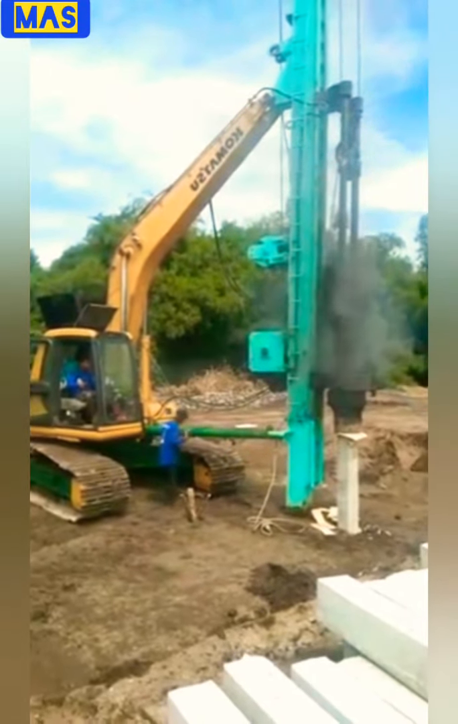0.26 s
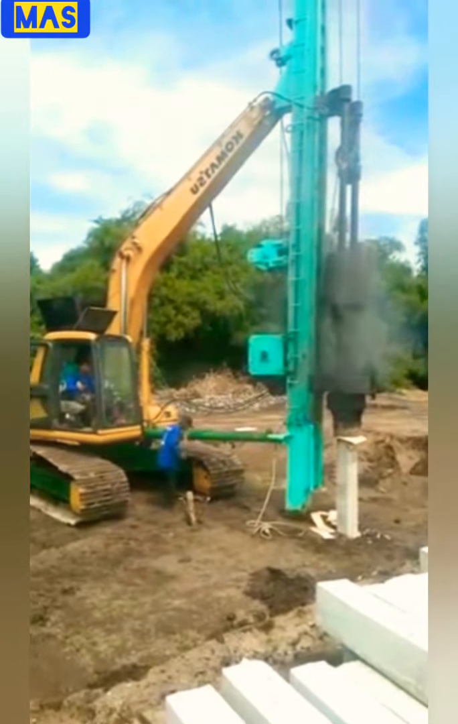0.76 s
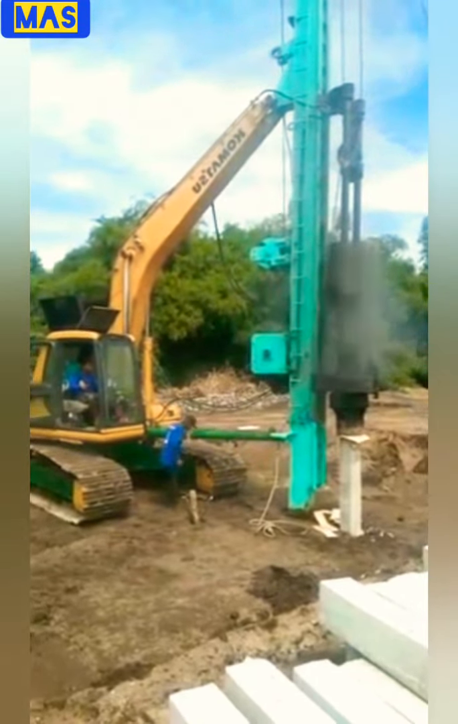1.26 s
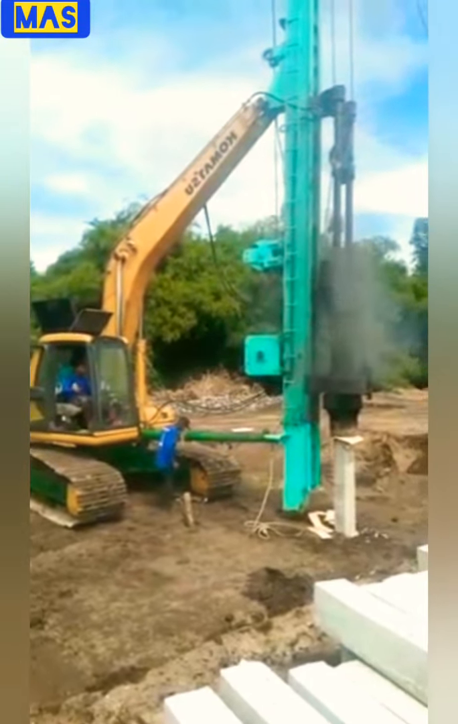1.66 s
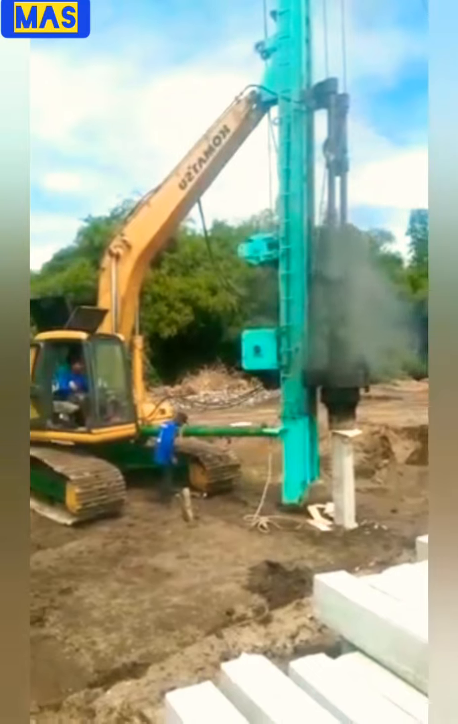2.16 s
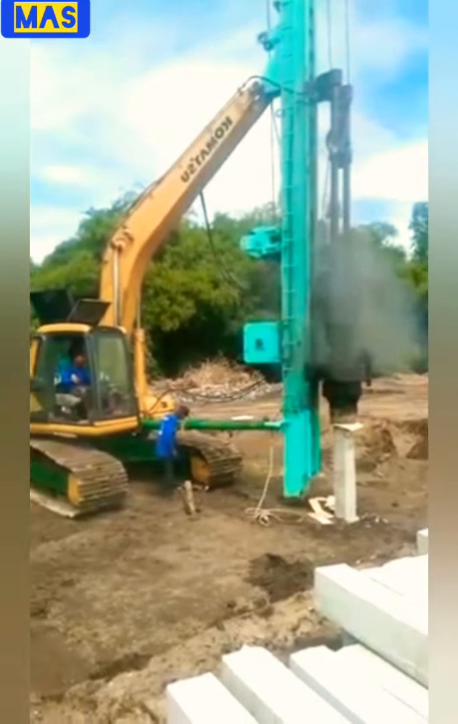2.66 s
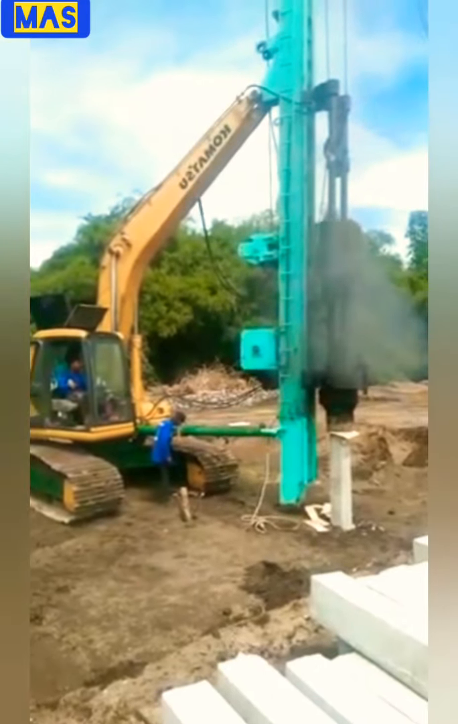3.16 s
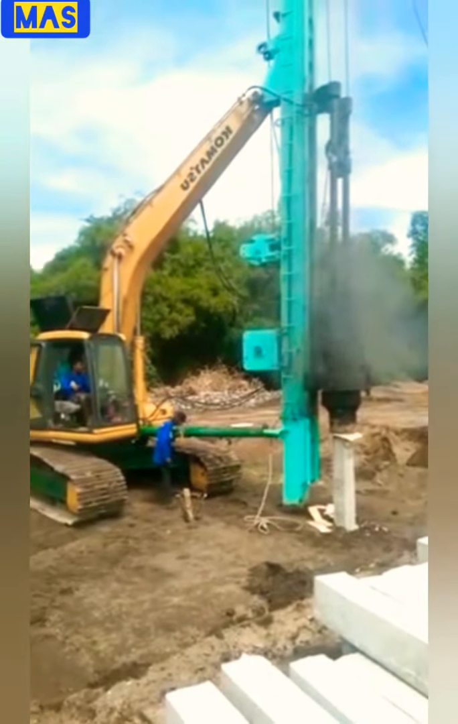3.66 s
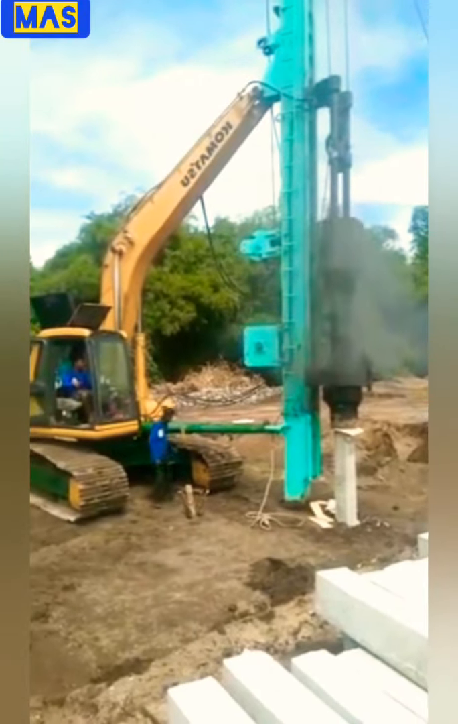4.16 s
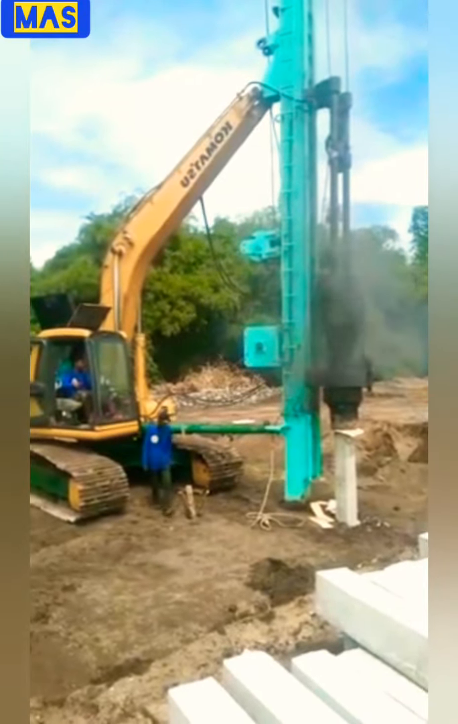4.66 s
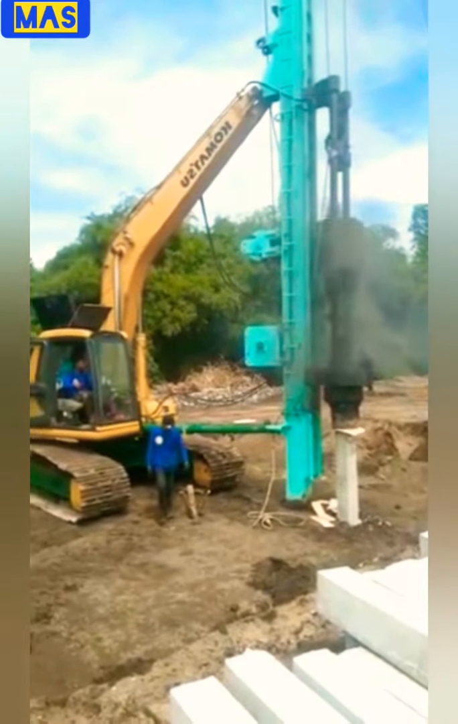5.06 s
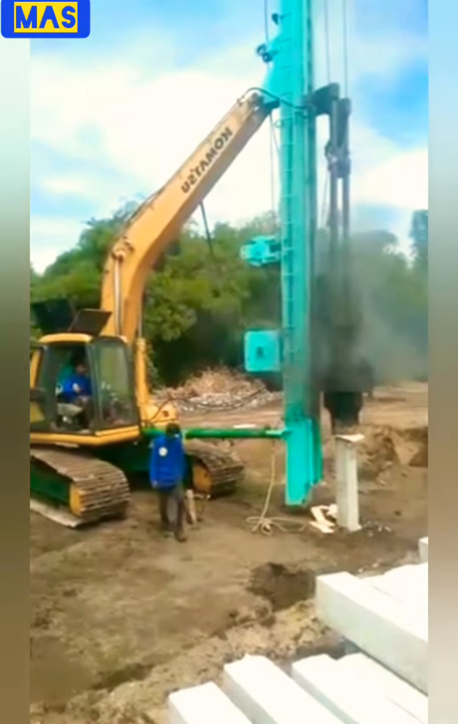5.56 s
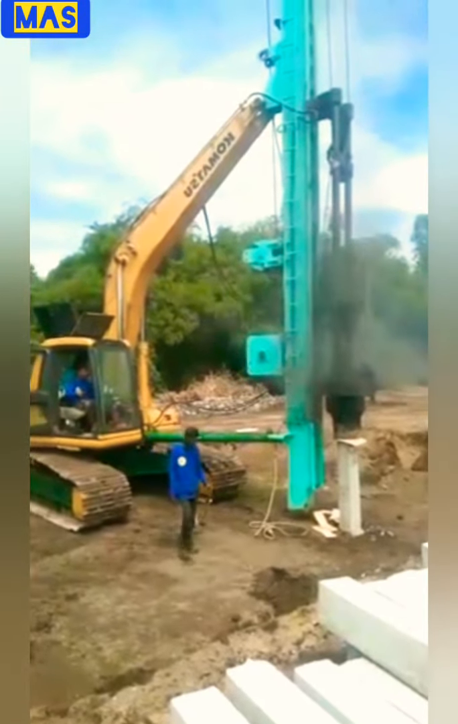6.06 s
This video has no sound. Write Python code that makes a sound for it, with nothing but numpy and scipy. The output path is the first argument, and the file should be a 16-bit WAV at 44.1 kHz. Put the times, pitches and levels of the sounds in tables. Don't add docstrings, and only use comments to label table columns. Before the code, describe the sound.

Seven strong metal strikes repeat evenly over a low, lumpy diesel idle. A dull double knock announces each bright clang; loose steel clatters for a moment until exhaust gas bursts out with a deep pipe-like thump. Air is sucked back with a brief hiss, then faint ticks and soft thuds fill the gap. Outdoors, with short scattered reflections, heard from a distance through a limited phone microphone.

```python
import sys
import numpy as np
from scipy import signal
from scipy.fft import rfft, irfft
from scipy.io import wavfile
from scipy.ndimage import uniform_filter1d, minimum_filter1d

SR = 44100
rng = np.random.default_rng(int(sys.argv[2]) if len(sys.argv) > 2 else 0)


def gain_from_decibels(decibels):
    exponent = np.asarray(decibels, float) / 20
    return 10 ** exponent


def persist_wave(psi):
    counts = np.round(np.clip(psi, -1, 1) * 32767).astype(np.int16)
    wavfile.write(sys.argv[1], SR, np.atleast_2d(counts).T)


N = 277830
AFTER = np.arange(SR // 4) / SR


def noise(count=len(AFTER)):
    return rng.standard_normal(count)


def evened(x):
    return x / np.sqrt(np.mean(x ** 2) + 1e-20)


def add(mix, s, sound):
    part = mix[round(s * SR):][:len(sound)]
    part += sound[:len(part)]


def coloured(x, colour):
    f, db = np.transpose(colour)
    hz = np.fft.rfftfreq(len(x), 1 / SR)
    level_db = np.interp(np.log(hz + 1), np.log(f + 1), db, -90, -90)
    return evened(irfft(rfft(x) * gain_from_decibels(level_db), len(x)))


def resonate(x, hz, width):
    r = np.exp(-np.pi * width / SR)
    return evened(signal.lfilter([1, 0, -1], [1, -2 * r * np.cos(2 * np.pi * hz / SR), r * r], x))


def swell(t, rise, t60):
    return (1 - np.exp(-t / rise)) ** 2 * gain_from_decibels(-60 * t / t60)


def later(t, s, db, rise, t60):
    return gain_from_decibels(db) * swell(np.maximum(t - s, 0), rise, t60)


def wander(count, span):
    return evened(uniform_filter1d(uniform_filter1d(noise(count), int(span)), int(span)))


def rung(knocks, parts, spread_db):
    rings = []
    for hz, width, db in parts:
        hits = knocks * gain_from_decibels(spread_db * wander(len(knocks), 470))
        rings.append(gain_from_decibels(db) * resonate(hits, hz, width))
    return rings


def ring_out(hz, db, t60):
    wavering = gain_from_decibels(db + 3.3 * wander(len(AFTER), 116))
    return wavering * np.sin(2 * np.pi * hz * AFTER) * swell(AFTER, 0.0011, t60)


def pipe(start_hz, end_hz, rise, t60):
    turns = np.cumsum(end_hz + (start_hz - end_hz) * np.exp(-AFTER / .018)) / SR
    return np.sin(2 * np.pi * turns) * swell(AFTER, rise, t60)


# start_s, peak_db, main_ring_hz, top_ring_db (against the main ring)
BLOWS = [
    (0.2003, -6.5, 4070, 0),
    (1.0805, -7.5, 4150, -23),
    (1.9641, -4, 4010, -27),
    (2.857, -9, 4020, -31),
    (3.7512, -4.5, 4030, -6),
    (4.6421, -4.5, 4090, -22),
    (5.545, -6, 4150, -7),
]
# pitch_hz, level_db, t60_s
ANVIL_RINGS = [(1800, -22, .04), (2390, -10, .085), (2650, -20, .1), (4560, -11, .05), (4800, -15, .045),
               (5200, -14, .03), (5900, -16, .035), (6600, -14, .03), (7400, -20, .045)]
# pitch_hz, density_db (per Hz)
CRACK_COLOUR = [(300, -26), (900, -19.5), (1500, -10.5), (2400, -2), (3300, -22.5), (4300, -3), (6000, -12),
                (8200, -7), (8800, -24.5), (14500, -26.5), (16000, -30)]


def blow(peak_db, hz, top_db):
    contact = np.exp(-(AFTER / .0098) ** 3) + .07 * np.exp(-AFTER / .008)
    onset = (1 - np.exp(-AFTER / .0011)) ** 2
    turns = np.cumsum(hz * (1 + .25 * np.exp(-AFTER / .0016))) / SR
    main = np.sin(2 * np.pi * turns) + gain_from_decibels(top_db) * np.sin(2 * np.pi * 8060 * AFTER)
    main = main * (1 - np.exp(-AFTER / 0.0016)) ** 2
    rings = np.zeros(len(AFTER))
    for f, db, t60 in ANVIL_RINGS:
        rings += gain_from_decibels(db - 60 * AFTER / t60) * np.sin(2 * np.pi * (f * AFTER + rng.random()))
    crack = gain_from_decibels(-60 * AFTER / 0.07) * coloured(noise(), CRACK_COLOUR)
    return gain_from_decibels(peak_db + 7.5) * ((main + crack) * contact + rings) * onset


# start_s, jet_db
BARKS = [
    (0.35, 3.5),
    (1.221, 5),
    (2.105, 5.5),
    (3.001, 5.5),
    (3.898, -6),
    (4.782, 7.5),
    (5.691, -14.5),
]
# pitch_hz, density_db (per Hz)
JET_COLOUR = [(150, -58), (250, -5.5), (845, -21), (1330, -18.5), (1880, -18), (2280, -9), (2620, -19.5),
              (3280, -21), (4260, -12), (6140, -13.5), (7570, -4.5), (8550, -22.5), (16000, -40.5)]


def bark(mix, s, jet_db):
    jet = coloured(noise(), JET_COLOUR)
    puff = np.exp(-((AFTER - .019) / .0062) ** 4)
    leak = gain_from_decibels(-5.5 - 0.86 * jet_db) * swell(AFTER, 0.0048, 0.12)
    add(mix, s - .01, gain_from_decibels(jet_db - 6) * jet * (puff + leak))
    add(mix, s, gain_from_decibels(jet_db - 19.0) * pipe(162, 160, 0.00035, 0.079))


# start_s, level_db
BOOMS = [
    (0.363, -2.5),
    (1.2322, -3.5),
    (2.112, -3),
    (3.0152, -3.5),
    (3.906, -4.5),
    (4.7958, -2),
    (5.694, -3.5),
]


def boom(db):
    slow = gain_from_decibels(-17.5) * pipe(121.5, 140.4, .02, 0.27)
    return gain_from_decibels(db + 4) * (pipe(103.5, 135.6, 0.0023, 0.12) + slow)


# start_s, clatter_db, mast_db, rise_s, clatter_t60_s
REBOUNDS = [
    (0.238, -6, -11, 0.001, 0.22),
    (1.107, -5, -10.5, 0.0011, 0.21),
    (1.992, -6, -10.5, 0.0017, 0.22),
    (2.894, -8.5, -12, 0.0025, 0.24),
    (3.787, -2.5, -12.5, 0.0034, 0.14),
    (4.680, -1, -12, 0.0044, 0.14),
    (5.581, -7.5, -15, .005, 0.19),
]
# start_s, clatter_db, mast_db
JOLTS = [
    (.29, -32, -21.5),
    (1.156, -25, -23),
    (2.05, -20, -18.5),
    (2.94, -27, -18),
    (3.84, -17, -22.5),
    (4.731, -24, -20),
    (5.628, -17, -20),
]
# scrape_db (before the blow), shiver_db (after it)
GUIDES = [
    (-32.5, 0),
    (-20, -5),
    (-23, 0.5),
    (-22, 3),
    (-16, 0),
    (-21, -0.5),
    (-21, 1),
]
# pitch_hz, density_db (per Hz)
CLATTER_COLOUR = [(530, -34), (900, -10), (1290, -8), (1370, -6), (1550, -8.5), (2170, -0.5), (2730, -1.5),
                  (3730, -3.5), (4150, 0), (6030, -4.5), (6560, 1.5), (9090, -19.5), (16000, -72)]
# pitch_hz, density_db (per Hz)
MAST_COLOUR = [(71, -47), (120, -15.5), (264, -13), (416, 1), (593, -21.5), (782, -5), (987, -9.5),
               (1290, -22), (1380, -27), (1700, -16.5), (2210, -10.5), (3740, -120)]
# pitch_hz, width_hz, level_db
STEEL_PARTS = [(322, 13, -2.5), (411, 6.7, 4.5), (704, 58, 11), (938, 9.1, 6), (1363, 14, 9),
               (2034, 33, -25), (2210, 16, -24), (2595, 20, 16), (2650, 220, 18), (2940, 10, -8),
               (4150, 91, 1.5), (4500, 50, -21), (6250, 76, -41)]


def rattle(mix, blow_s, guides, rebound, jolt, still_s):
    scrape_db, shiver_db = guides
    s, clatter_db, mast_db, rise, t60 = rebound
    jolt_s, jolt_db, jolt_mast_db = jolt
    t = blow_s - .018 + AFTER
    shiver_s, mast_t60, jolt_rise = blow_s + .013, 0.33, 0.005
    knocks = noise() * gain_from_decibels(1.55 * wander(len(AFTER), 62))
    rings = rung(knocks, STEEL_PARTS, 8.3)
    mast = evened(coloured(knocks, MAST_COLOUR) + gain_from_decibels(-12.5) * evened(sum(rings[:4])))
    clatter = evened(coloured(knocks, CLATTER_COLOUR) + gain_from_decibels(-3.5) * evened(sum(rings[4:])))
    shake = later(t, shiver_s, shiver_db - 13.5, 0.0037, 0.14)
    shake += later(t, s, clatter_db, rise, t60)
    shake += later(t, jolt_s, jolt_db, jolt_rise, 0.13)
    shake += gain_from_decibels(scrape_db) * np.exp(-abs(t - blow_s) / 0.0023)
    sway = later(t, shiver_s, -28, .002, mast_t60)
    sway += later(t, s, mast_db, 0.0015, mast_t60)
    sway += later(t, jolt_s, jolt_mast_db, jolt_rise, 0.62)
    stilled = gain_from_decibels(-1200 * np.maximum(t - still_s, 0))
    add(mix, t[0], (shake * clatter + sway * mast) * stilled)
    add(mix, s + .02, ring_out(329, mast_db - 14, .25))


# start_s, pitch_hz, level_db
PINGS = [(4.553, 900, -15), (3.675, 950, -21), (.24, 2810, -11), (.245, 2210, -10), (.292, 7800, -16),
         (.295, 423, -12.5), (1.108, 10000, -8.5), (1.126, 6400, -19), (1.124, 2180, -6),
         (1.158, 2650, -11), (1.995, 5900, -7.5), (2.015, 6500, -21), (2.01, 5030, -10),
         (2.055, 2650, -12.5), (2.053, 4150, -11), (2.07, 6800, -24), (2.884, 6500, -18),
         (2.897, 2200, -14), (2.955, 445, -22), (2.942, 8220, -23), (3.847, 4230, -9.5), (3.84, 8060, -15),
         (3.789, 906, -7), (3.858, 340, -26), (4.688, 6415, -7), (4.688, 2730, -11), (4.735, 4150, -14),
         (5.572, 6750, -16), (5.585, 1000, -9), (5.635, 3500, -20)]
# pitch_hz, t60_s
PING_T60 = [(420, 0.12), (920, 0.094), (2600, 0.093), (4200, .055), (6500, 0.1), (8100, .035)]


def ping(hz, db):
    return ring_out(hz, db, np.interp(hz, *np.transpose(PING_T60)))


# start_s, level_db, treble_db (against body), second_knock_db, lever_ring_db
CLANKS = [
    (0.1122, -13.5, -9, -25, -43),
    (.993, -19, -9, -29, -35),
    (1.875, -12, -16, -20, -31),
    (2.776, -14, -9, -42, -26),
    (3.6665, -12, -5, -20, -45),
    (4.552, -12, -9.5, -22, -31),
    (5.468, -14, -7.5, -34, -30),
]
# pitch_hz, density_db (per Hz)
CLANK_COLOUR = [(59, -39), (100, 10), (442, 3.5), (583, -4.5), (872, 5), (1200, -1.5), (1800, 8),
                (3250, -5.5), (4470, -4), (7610, -4), (9020, -28), (14700, -48), (16000, -48)]
# pitch_hz, width_hz, level_db
LEVER_PARTS = [(467, 16, 2.5), (810, 310, 14), (1460, 30, -28.5), (2200, 95, 14), (2545, 140, 12.5),
               (4300, 98, 5)]


def clank(mix, s, level_db, treble_db, second_db, ring_db):
    touch_s = .011
    knocks = noise() * gain_from_decibels(1.04 * wander(len(AFTER), 79))
    body = evened(coloured(knocks, CLANK_COLOUR) + gain_from_decibels(-6) * evened(sum(rung(knocks, LEVER_PARTS, 7.7))))
    top = signal.lfilter(*signal.butter(2, 3300, "high", fs=SR), body)
    touch = later(AFTER, 0, level_db - 7, .003, 0.18)
    first = later(AFTER, touch_s, level_db + 3.5, 0.0012, 0.058)
    second = later(AFTER, touch_s + 0.014, second_db - 2.5, 0.0041, 0.071)
    bright = gain_from_decibels(treble_db + 7.0) * (first + 0.47 * touch) + gain_from_decibels(14.5) * second
    add(mix, s - touch_s, (body - top) * (touch + first + second) + top * bright)
    add(mix, s - touch_s, gain_from_decibels(level_db - 5) * pipe(204, 167, 0.0037, 0.066))
    add(mix, s + 0.033, ring_out(1315, ring_db, 0.094))


# start_s, hiss_db, boom_db
GULPS = [
    (0.422, -27, -15),
    (1.3021, -30.5, -17.5),
    (2.1843, -29, -17.5),
    (3.0743, -25, -17.5),
    (3.9715, -26.5, -17.5),
    (4.8685, -26, -19),
    (5.7687, -26, -16),
]
# pitch_hz, density_db (per Hz)
GULP_COLOUR = [(880, -45), (1500, -22), (2270, 5), (2830, -19), (4200, 2.5), (7460, 9.5), (8240, 2.5),
               (10600, -20.5), (14900, -25), (16000, -40)]


def gulp(mix, s, hiss_db, boom_db):
    fade = swell(AFTER, 0.0019, 0.046) + gain_from_decibels(-30.5) * swell(AFTER, 0.0014, 1.0)
    add(mix, s - .003, gain_from_decibels(hiss_db + 10.5) * coloured(noise(), GULP_COLOUR) * fade)
    slide = coloured(noise(), GULP_COLOUR) * np.exp(-((AFTER - 0.14) / 0.074) ** 2)
    add(mix, s + .04, gain_from_decibels(-49) * slide)
    drawn = pipe(95, 143.3, 0.012, 0.17) * np.exp(-(AFTER / 0.082) ** 4)
    add(mix, s + 0.00051, gain_from_decibels(boom_db + 14) * drawn)
    add(mix, s + .085, gain_from_decibels(boom_db - 9.5) * pipe(125, 143.8, 0.004, 0.32))


# start_s, level_db
THUDS = [
    (.635, -24.5),
    (1.585, -24),
    (2.385, -25.5),
    (3.631, -23),
    (4.43, -27),
    (5.05, -31),
    (5.35, -22.5),
    (6.16, -32),
]


def thud(db):
    return gain_from_decibels(db + 6) * pipe(89, 62, 0.0074, 0.18)


# start_s, peak_db
TICKS = [(0.464, -34.5), (0.7644, -46), (1.3444, -35), (1.609, -32.5), (2.2258, -35), (2.5067, -41),
         (3.1055, -45), (3.3937, -36), (4.015, -33.5), (4.2977, -38), (4.904, -38), (5.1915, -39),
         (5.7992, -35)]


def tick(db):
    return gain_from_decibels(db) * coloured(noise(), GULP_COLOUR) * swell(AFTER, 0.001, 0.059)


# multiple (of the slip rate), level_db
SQUEAK_PARTIALS = [(1, -39.5), (3, -39.5), (4, -34), (5.12, -50), (6.4, -44), (10.95, -36)]


def squeak():
    length_s, slip_hz = 0.036, 599
    t = np.arange(0, 2 * length_s, 1 / SR)
    slips = noise(len(t))
    tone = sum(gain_from_decibels(db) * resonate(slips, k * slip_hz, 11.0) for k, db in SQUEAK_PARTIALS)
    scrape = gain_from_decibels(-41) * coloured(slips, CLATTER_COLOUR)
    return (tone + scrape) * np.clip(t / 0.0036, 0, 1) * np.exp(-(t / length_s) ** 4)


# time_s, firing_hz, body_db (body and fan)
ENGINE = [(0, 89, -47), (.6, 91.8, -42.5), (1, 88.8, -47), (1.6, 88.5, -45.5), (2.2, 84.8, -47.5),
          (2.7, 88.7, -46.5), (3.4, 87.4, -46.5), (4.1, 86.4, -48.5), (4.5, 88.8, -45.5), (5.1, 86.3, -48),
          (5.5, 88.3, -45), (5.95, 86, -44), (6.3, 89, -45.5)]
# pitch_hz, density_db (per Hz)
RUMBLE_COLOUR = [(12, -47), (20, -24), (59, -3), (81, -11.5), (98, -13), (114, -3), (145, -10.5),
                 (162, -8.5), (187, -15.5), (230, -21), (300, -62), (510, -120)]
# pitch_hz, density_db (per Hz)
BODY_COLOUR = [(100, -41), (170, -40), (194, -5), (364, -7.5), (400, 3), (432, -7), (532, -16), (608, -19),
               (978, -9.5), (1510, -22), (2170, -18), (2950, -27), (7060, -23), (9000, -39.5), (10800, -46),
               (11500, -60), (16000, -62)]
# pitch_hz, width_hz, level_db
PANELS = [(274, 38, -50.5), (416, 64, -53), (812, 29, -57), (1030, 150, -71), (2090, 540, -61.5)]


def excavator():
    t = np.arange(N) / SR
    s, hz, db = np.transpose(ENGINE)
    firing_hz, body_db = np.interp(t, s, hz), np.interp(t, s, db)
    sunk = np.zeros(N)
    for blow_s, *_ in BLOWS:
        sunk += np.clip((t - blow_s) / 0.26, 0, 1) * np.exp(-(abs(t - blow_s) / 0.49) ** 1.87)
    rumble_db = -37 - 7.5 * sunk + 3.1 * wander(N, 1700)
    rumble = coloured(noise(N), RUMBLE_COLOUR) * gain_from_decibels(rumble_db)
    turns = np.cumsum(firing_hz * (1 + 0.015 * wander(N, 1000))) / SR
    tone_db = -31.5 - 19 * sunk + 3.6 * wander(N, 1700)
    tone = gain_from_decibels(tone_db) * np.sin(2 * np.pi * turns)
    throb_db = 0.54 * np.cos(np.pi * turns) + 1.68 * wander(N, 640)
    body = coloured(noise(N), BODY_COLOUR) * gain_from_decibels(body_db + 6.0 - 1.5 * sunk + throb_db)
    low = signal.filtfilt(*signal.butter(2, 1650, fs=SR), body)
    body = body + (gain_from_decibels(-3.5 * sunk) - 1) * low
    hum = sum(gain_from_decibels(db) * resonate(noise(N), f, w) for f, w, db in PANELS)
    return rumble + tone + body + hum * gain_from_decibels(4.5 * sunk)


# pitch_hz, t60_s
YARD = [(200, 0.41), (500, 0.57), (1000, 0.33), (2200, 0.22), (5000, 0.095), (10000, 0.15)]


def yard(x):
    hz, t, z = signal.stft(noise(SR // 2), SR, nperseg=256)
    f, t60 = np.transpose(YARD)
    fade = gain_from_decibels(-60 * t / np.interp(hz, f, t60)[:, None])
    tail = signal.istft(z * fade, SR, nperseg=256)[1]
    return signal.fftconvolve(x, tail / np.linalg.norm(tail))[:N]


def scene():
    steel, gas = np.zeros(N), np.zeros(N)
    for s, *rest in BLOWS:
        add(steel, s, blow(*rest))
    for hit, guides, rebound, jolt, ports in zip(BLOWS, GUIDES, REBOUNDS, JOLTS, BARKS):
        rattle(steel, hit[0], guides, rebound, jolt, ports[0])
    for s, hz, db in PINGS:
        add(steel, s, ping(hz, db))
    for row in CLANKS:
        clank(steel, *row)
    for s, db in TICKS:
        add(steel, s - .002, tick(db))
    add(steel, 5.022, squeak())
    for row in BARKS:
        bark(gas, *row)
    for s, db in BOOMS:
        add(gas, s, boom(db))
    for row in GULPS:
        gulp(gas, *row)
    for s, db in THUDS:
        add(gas, s, thud(db))
    scattered = gain_from_decibels(-14.5) * yard(steel + gain_from_decibels(-8.0) * gas)
    mix = steel + scattered + gas + excavator()
    return np.array([mix, mix])


def top_cut(x):
    return signal.sosfilt(signal.butter(12, 16280, fs=SR, output="sos"), x)


def record(dry):
    x = dry[0]
    peak = -minimum_filter1d(-abs(x), size=260)
    held = x / uniform_filter1d(np.maximum(peak / 1.3, 1), size=200)
    held = np.clip(held, -1.05, 1.05)
    held = signal.oaconvolve(held, signal.firwin(255, 15650, fs=SR), "same")
    treble = signal.lfilter(*signal.butter(6, 3900, "high", fs=SR), held)
    level = uniform_filter1d(abs(treble), size=60)
    sudden = np.clip((level - 6 * np.roll(level, 130)) / .3, 0, 1)
    side = gain_from_decibels(-6) * sudden * np.roll(treble, 7)
    return top_cut(np.array([held + side, held - side]))


dry = scene()
out = record(dry)
persist_wave(out)
```